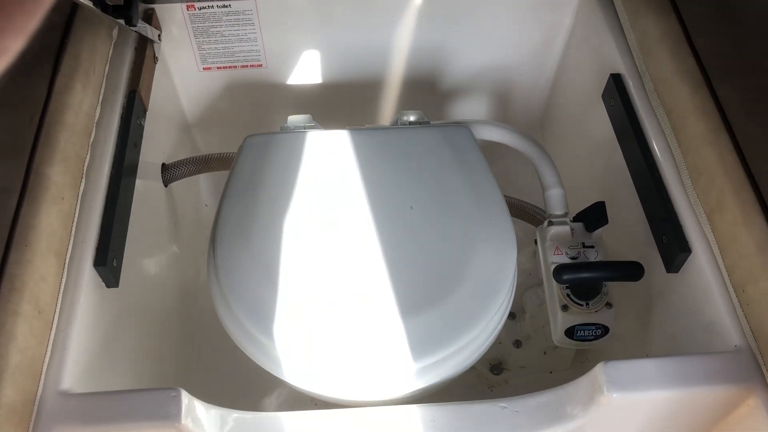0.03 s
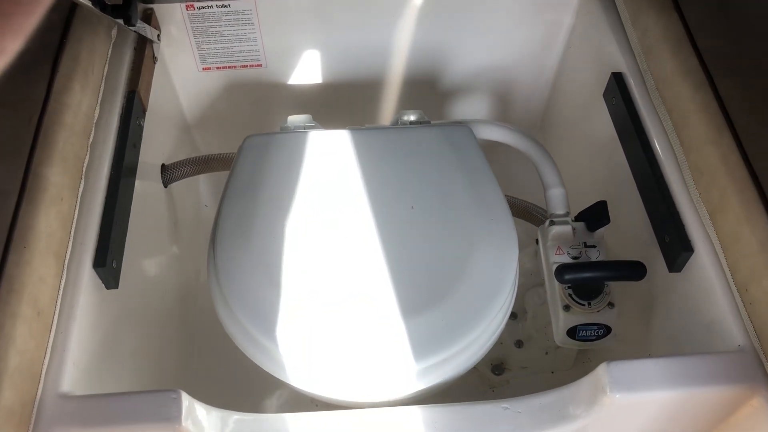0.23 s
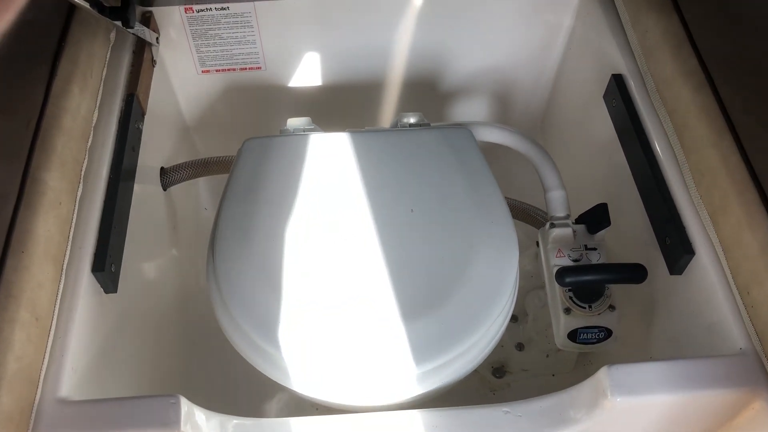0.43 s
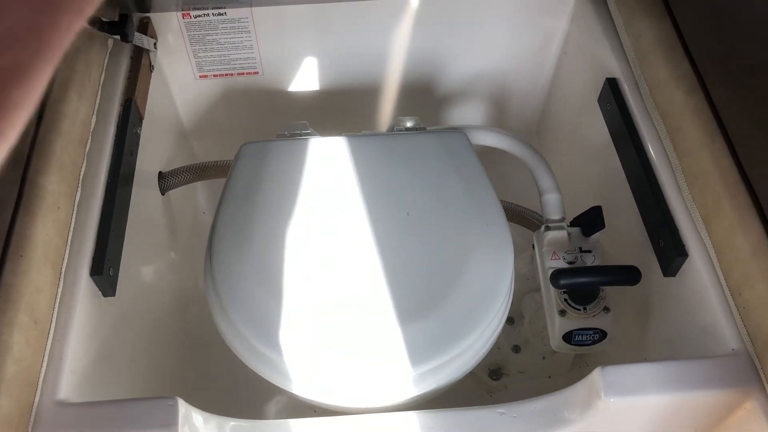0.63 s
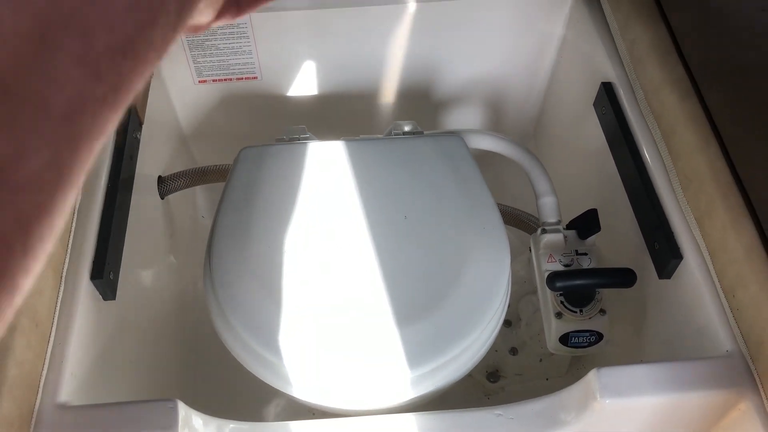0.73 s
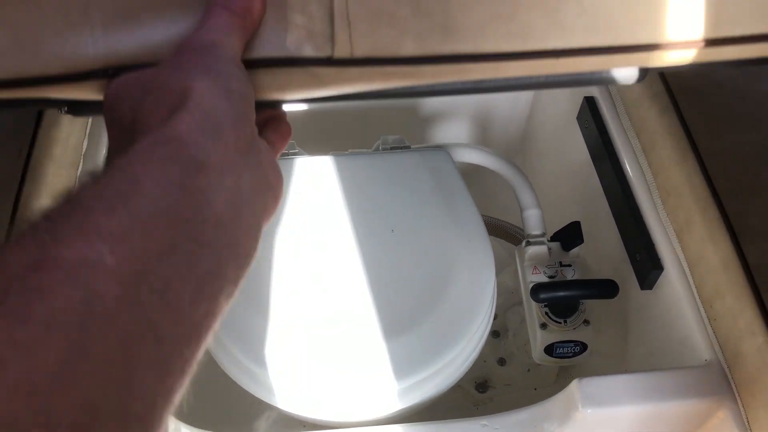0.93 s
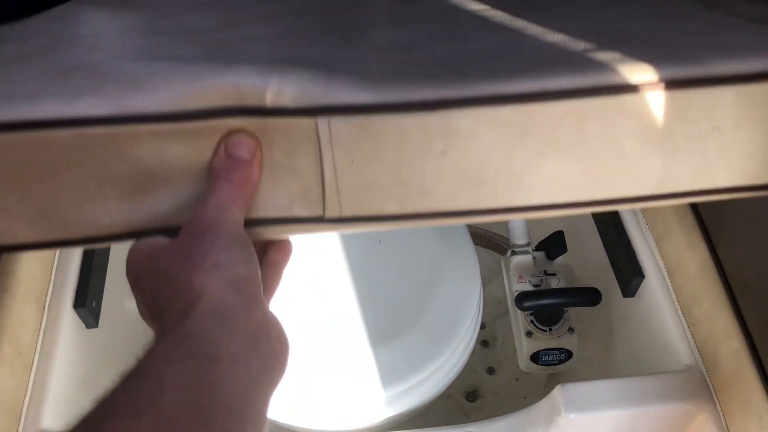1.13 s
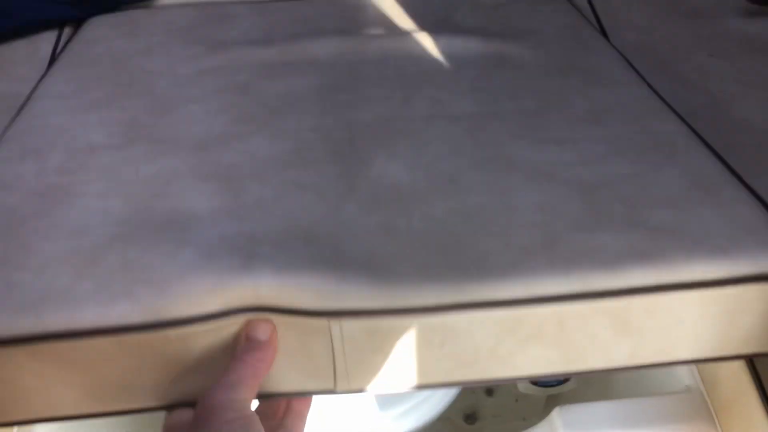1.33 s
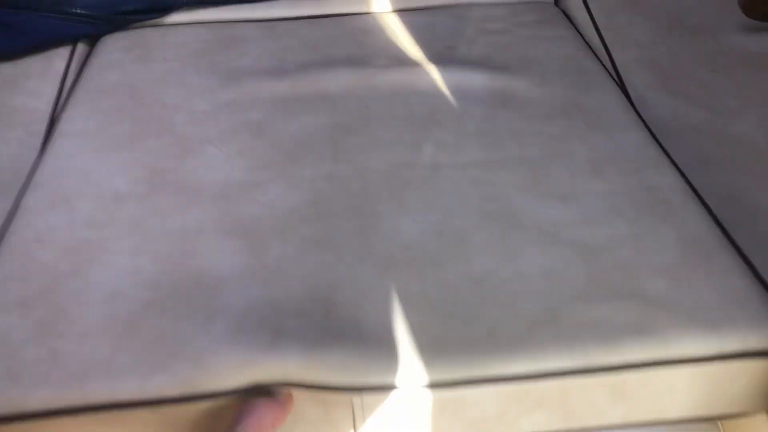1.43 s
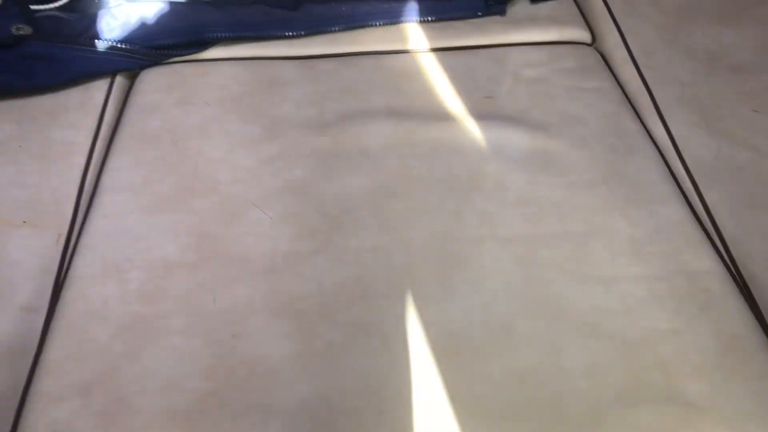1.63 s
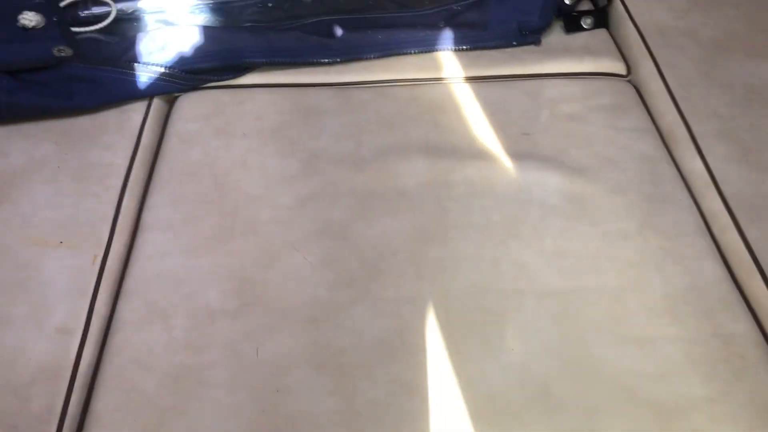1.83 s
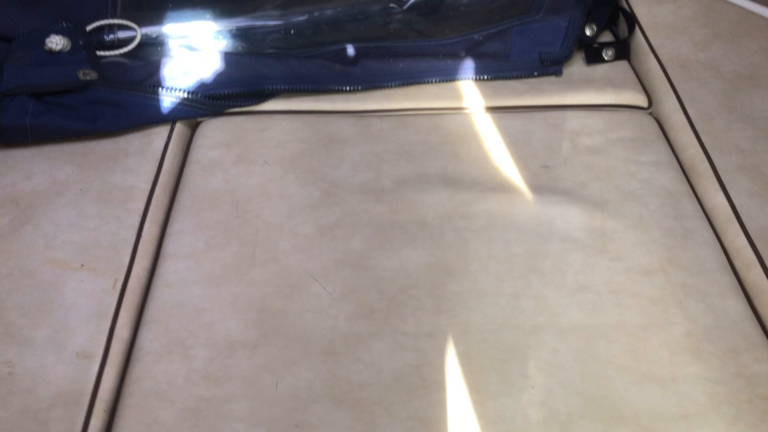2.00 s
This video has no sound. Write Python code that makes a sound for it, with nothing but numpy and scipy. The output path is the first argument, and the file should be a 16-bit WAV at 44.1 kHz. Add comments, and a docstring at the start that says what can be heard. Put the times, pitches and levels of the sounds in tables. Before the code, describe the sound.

A cushioned lid is lowered and shuts with a hard clack and hollow thump.

```python
"""A hinged, cushioned berth lid lands on its rim, close up in a small boat cabin: a hard clack of the edge,
the boom of the lid and the hollow locker, then two small bounces. On the way down, fingers knock on the
padded panel, the upholstery rustles, the hinge clicks under load and air puffs out of the locker.
A faint squeak opens the move, and quiet cabin air lies under it all."""
import sys
import numpy as np
from scipy import signal
from scipy.fft import rfft, irfft
from scipy.io import wavfile

SR = 44100
rng = np.random.default_rng(int(sys.argv[2]) if len(sys.argv) > 2 else 0)


def materialize(psi):
    """Save the field psi as 16-bit PCM at rate SR to the path in sys.argv[1].

    A 1-D psi becomes a single channel; in a 2-D psi each row is a channel.
    """
    bounded = np.clip(np.atleast_2d(psi).T, -1, 1)
    quanta = np.round(bounded * 32767).astype(np.int16)
    wavfile.write(sys.argv[1], SR, quanta)


N = 90978


def undb(db):
    """Decibels to gain."""
    return 10 ** (np.asarray(db) / 20)


def since(start):
    """Seconds since a cue, zero before it."""
    return np.maximum(np.arange(N) / SR - start, 0)


def fade(t, t60):
    """Exponential decay, 60 dB down after t60 seconds."""
    return undb(-60 * t / max(t60, 1e-3))


def swell(t, rise):
    """Smooth attack over about rise seconds."""
    return 1 - np.exp(-(t / rise) ** 2)


def burst(t, rise, hold, t60, tail_db, tail_t60):
    """Envelope of a contact: attack, hold, quick release and the cabin's longer tail."""
    late = np.maximum(t - hold, 0)
    return swell(t, rise) * np.hypot(fade(late, t60), undb(tail_db) * fade(late, tail_t60))


def curve(points):
    """Fader ride through (t/s, level/dB) points."""
    return undb(np.interp(since(0), *np.array(points).T))


def noise(colour, grain=0):
    """Noise of rms 1 with an (f/Hz, level/dB) colour; grain makes it crackle."""
    hz, db = np.array(colour).T
    freqs = np.maximum(np.fft.rfftfreq(N, 1 / SR), 1)
    source = rng.standard_normal(N) * undb(grain * rng.exponential(size=N))
    eq = undb(np.interp(np.log(freqs), np.log(hz), db))
    coloured = irfft(rfft(source) * eq, N)
    return coloured / coloured.std()


def ring(modes, t):
    """Decaying sine modes from (f/Hz, level/dB, t60/s) rows."""
    return sum(undb(db) * fade(t, t60) * np.sin(2 * np.pi * hz * t) for hz, db, t60 in modes)


def dull(x, hz):
    """Low-pass: a softer contact loses treble."""
    return signal.sosfilt(signal.butter(2, min(hz, .45 * SR), fs=SR, output="sos"), x)


def thin(x, hz):
    """High-pass: takes out the bass."""
    return signal.sosfilt(signal.butter(3, hz, "high", fs=SR, output="sos"), x)


# colour of the room tone: f/Hz, level/dB
CABIN = [(25, -13), (60, 5.5), (150, -1.5), (330, -4.5), (700, -11), (1500, -15.5), (2300, -23.5),
         (6000, -25), (15500, -32)]
def cabin_air():
    """A quiet, dark bed of cabin air."""
    return undb(-65.5) * noise(CABIN)


# spectrum of the squeak's pitch wobble: f/Hz, level/dB
WAVER = [(30, -3), (1000, -82)]
def squeak(length_s=0.26, start_hz=1600, sag_hz_per_s=470, waver_hz=15):
    """A faint, wavering squeak that sinks in pitch."""
    t = since(0.06)
    hz = start_hz - sag_hz_per_s * t + waver_hz * noise(WAVER)
    progress = np.minimum(t / length_s, 1)
    arch = np.sqrt(np.abs(np.sin(np.pi * progress)))
    return undb(-76.5) * arch * np.sin(2 * np.pi * np.cumsum(hz) / SR)


# fader rides of the rustle and the rumble: t/s, level/dB
RUSTLE_RIDE = [(0, -77), (.5, -83), (.6, -63), (.81, -62.5), (.9, -55), (1.04, -65), (1.16, -57.5),
               (1.33, -58.5), (1.43, -51.5), (1.66, -52), (1.79, -45.5), (1.85, -37.5), (1.92, -69),
               (1.985, -61), (1.997, -51.5), (2.06, -50.5)]
RUMBLE_RIDE = [(0, -75), (.47, -81), (.57, -58.5), (.75, -60.5), (.85, -54.5), (.95, -62), (1.3, -60),
               (1.5, -53), (1.7, -60), (1.79, -44), (2.06, -44.5)]
# their colours: f/Hz, level/dB
RUSTLE = [(200, -6), (600, 4.5), (1100, 0), (2200, -1), (3800, -2), (6000, -5.5), (9000, -10.5),
          (15000, -18)]
RUMBLE = [(25, -13), (50, -15), (90, -1.5), (150, 2.5), (280, -1.5), (450, -4.5), (1000, -21.5),
          (3000, -57)]
def handling():
    """Upholstery and sleeve give a grainy rustle; the moving lid rumbles under the hand."""
    rustle = curve(RUSTLE_RIDE) * noise(RUSTLE, grain=1.8)
    rumble = curve(RUMBLE_RIDE) * noise(RUMBLE)
    return rustle + rumble


# finger cues: t/s, knock level/dB, tick level/dB, pitch f/Hz, knock low-pass f/Hz
TAPS = [(0.334, -58, -61.5, 685, 3000), (0.4697, -58.5, -63, 558, 3000), (.5405, -48, -48.5, 623, 3500),
        (0.6326, -45, -53.5, 545, 2210), (.7165, -43, -62, 619, 4000), (.7610, -47.5, -60, 571, 1200),
        (.795, -52.5, -67, 602, 1200), (.867, -51, -73, 623, 2500), (1.065, -55.5, -83, 614, 1200),
        (1.165, -50.5, -91, 590, 2500)]
# colours of the padded thud and the skin tick: f/Hz, level/dB
THUD = [(100, -6), (380, -22), (560, 3.5), (700, -2.5), (1000, -7.5), (2000, -13), (3300, -12.5),
        (7000, -48)]
TICK = [(150, 6.5), (700, 4), (2000, -12), (4000, -2), (6500, -8.5), (9000, -10.5), (15000, -18)]
# modes of the padded panel: multiple of the tap's pitch, level/dB, t60/s
PANEL_MODES = [(0.891, 3, 0.045), (1, 6, 0.042), (1.16, 0, 0.038)]
def fingers(low_cut_hz=302):
    """Damped knocks on the padded panel, each topped with a tick of skin on vinyl."""
    out = 0
    for start, knock_db, tick_db, pitch_hz, dull_hz in TAPS:
        t = since(start)
        contact = burst(t, rise=0.0016, hold=0.0036, t60=0.067, tail_db=-11, tail_t60=0.12)
        thud = undb(-2.5) * noise(THUD) * contact
        modes = [(pitch_hz * ratio, db, t60) for ratio, db, t60 in PANEL_MODES]
        panel = ring(modes, t) * swell(t, rise=0.0023)
        knock = dull(thin(thud + panel, low_cut_hz), dull_hz)
        tick = thin(noise(TICK), low_cut_hz) * swell(t, rise=0.00024) * fade(t, t60=0.21)
        out = out + undb(knock_db) * knock + undb(tick_db) * tick
    return out


# hinge cues: t/s, snap level/dB, spike level/dB, knock level/dB
CLICKS = [(1.371, -49, -36.5, -38), (1.4509, -23, -39, -37), (1.4803, -39, -58, -35.5),
          (1.514, -56, -69, -38.5)]
# colour of the tail after a snap: f/Hz, level/dB
SNAP_TAIL = [(900, 1.5), (2200, -4), (7500, -0.5), (10000, -10), (15000, -21)]
# modes of the panel at the hinge: f/Hz, level/dB, t60/s
HINGE_MODES = [(187, 1, 0.051), (245, 6, 0.046), (331, -0.5, 0.072), (410, 8, 0.024)]
def hinge(top_hz=10380, low_hz=900, sweep_s=0.000813):
    """The loaded hinge clicks: a tight snap with a bright spike, a thin tail and a low panel knock."""
    out = 0
    for start, snap_db, spike_db, knock_db in CLICKS:
        t = since(start)
        # treble runs through the panel faster than bass, so the snap sweeps down
        cycles = low_hz * t + (top_hz - low_hz) * sweep_s * (1 - np.exp(-t / sweep_s))
        snap = np.sin(2 * np.pi * cycles) * fade(t, t60=0.011)
        tail = undb(-17) * noise(SNAP_TAIL) * swell(t, rise=0.0023) * fade(t, t60=0.21)
        hiss = dull(thin(rng.standard_normal(N), hz=3850), hz=11900)
        spike = hiss * swell(t, rise=0.0002) * fade(t, t60=0.005)
        knock = ring(HINGE_MODES, t) * swell(t, rise=0.003)
        out = out + undb(snap_db) * (snap + tail) + undb(spike_db) * spike + undb(knock_db) * knock
    return thin(out, hz=191)


# mode of the air in the locker: f/Hz, level/dB, t60/s
LOCKER_MODE = [(62.4, -13.5, 0.066)]
# colour of that air as it moves: f/Hz, level/dB
LOCKER_AIR = [(25, -16), (46, 6), (85, -4), (180, -48)]
def locker(puff_s=1.75, puff_width_s=0.024, seal_s=1.822):
    """Air puffs out ahead of the lid; once sealed in, it gives one deep push and a weak rumble."""
    t = since(seal_s)
    rumble = undb(-34) * noise(LOCKER_AIR) * fade(t, t60=0.69)
    trapped = (ring(LOCKER_MODE, t) + rumble) * swell(t, rise=0.0069)
    squeeze = np.exp(-((since(0) - puff_s) / puff_width_s) ** 2 / 2)
    puff = undb(-48) * noise(LOCKER_AIR) * squeeze
    return puff + trapped


# hits on the rim, the last two being the bounces:
# t/s, clack level/dB, boom level/dB, clack high-pass f/Hz, clack low-pass f/Hz
HITS = [(1.7933, -18.5, -25, 1220, 2950), (1.8055, -14.5, -43, 2320, 10000), (1.8079, -11, -14, 1760, 9600),
        (1.8134, -15, -9, 257, 1730), (1.831, -17.5, -29, 396, 1000), (1.8900, -24.5, -24, 1880, 4560),
        (1.9445, -26.5, -26, 510, 4300)]
# modes of the lid's hard edge and of its body: f/Hz, level/dB, t60/s
EDGE_MODES = [(1780, -8, 0.1), (1987, -13, 0.17), (2278, -5, 0.13), (3026, -2.5, 0.14), (3285, -1, 0.12),
              (3448, -4, 0.19), (4686, 0.5, 0.056)]
BODY_MODES = [(129.8, -8.5, 0.34), (166.47, -6, 0.41), (176.2, 0.5, 0.13), (248, -9, 0.27),
              (361.2, -13, 0.23), (443.8, -7, 0.16), (478, -22, 0.57), (574.4, -10.5, 0.12),
              (667, -15, 0.08), (803, -9.5, 0.1), (1076, -22.5, 0.13), (1255, -25, 0.11)]
# colours of the clack's dense ring and of the cabin's answer to the boom: f/Hz, level/dB
CLACK = [(150, 10), (600, -1.5), (1200, -0.5), (2300, -7), (3300, 3), (4000, -2.5), (5000, -6),
         (6800, -12.5), (9000, -23.5), (15000, -36)]
CABIN_BOOM = [(48, -18), (100, -4), (170, -5), (300, -7.5), (600, -19.5), (1200, -36), (4000, -69)]
def lid_landing(rise_cycles=7.4, seated_s=2.008):
    """Each hit on the rim clacks at the lid's edge and sets its body booming into the cabin."""
    damping = fade(since(seated_s), t60=0.12)  # once the lid is seated, the cushion chokes its boom
    out = 0
    for start, clack_db, boom_db, thin_hz, dull_hz in HITS:
        t = since(start)
        rise = rise_cycles / dull_hz  # a duller contact has a slower attack
        contact = burst(t, rise, hold=0.0034, t60=0.02, tail_db=-6.5, tail_t60=0.22)
        crack = noise(CLACK, grain=0.94) * contact
        edge = undb(-9.5) * ring(EDGE_MODES, t) * swell(t, rise)
        clack = dull(thin(crack + edge, thin_hz), dull_hz)
        room = undb(-14) * noise(CABIN_BOOM) * fade(t, t60=0.27)
        body = ring(BODY_MODES, t)
        boom = thin((body + room) * swell(t, rise=0.0033), hz=99)
        out = out + undb(clack_db) * clack + undb(boom_db) * boom * damping
    return out


def scene():
    """Mono mix: the landing up front, the small handling sounds and room tone behind it."""
    return (lid_landing() + locker() + fingers() + hinge() + handling() + squeak() + cabin_air())[None]


def record(dry, low_cut_hz=32, high_cut_hz=15900):
    """Master EQ: roll off the deepest bass and cut the very top steeply."""
    high_cut = signal.ellip(10, .2, 70, high_cut_hz, fs=SR, output="sos")
    return signal.sosfilt(high_cut, thin(dry, low_cut_hz))


dry = scene()
out = record(dry)
materialize(out)
```